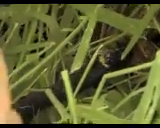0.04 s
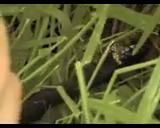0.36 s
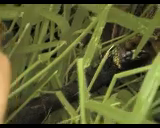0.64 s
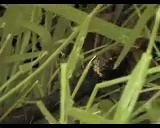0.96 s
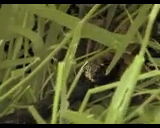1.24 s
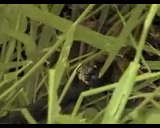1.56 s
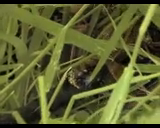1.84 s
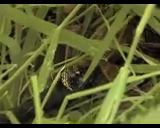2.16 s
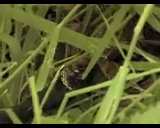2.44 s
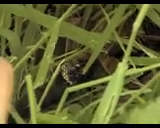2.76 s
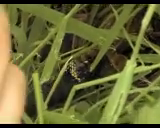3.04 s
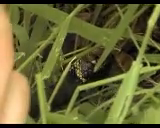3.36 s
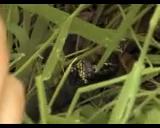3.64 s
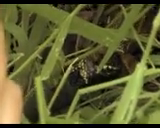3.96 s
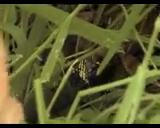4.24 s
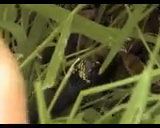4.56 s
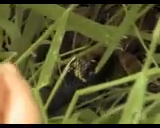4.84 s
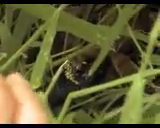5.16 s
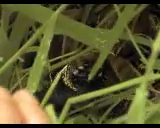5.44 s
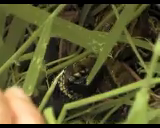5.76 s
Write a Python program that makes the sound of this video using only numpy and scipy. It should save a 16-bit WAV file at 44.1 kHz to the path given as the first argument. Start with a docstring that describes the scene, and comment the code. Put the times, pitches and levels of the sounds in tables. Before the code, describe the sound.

Heard from low in tall grass, distant traffic makes a continuous rushing noise with a deep engine rumble beneath it. Nearby, blades rustle and flick quietly as a hand moves among them, with one tiny squeak early on. A brief run of crisp stem cracks stands out before the middle, then the soft rustling goes on, with scattered ticks and two small snaps at the close.

```python
"""Tyre roar from a road some way off, heard from a stereo microphone low in tall grass.
The roar swells slowly as traffic passes, a little to the left, over a low rumble and far engines.
Close to the microphone a hand moves in the grass: blades hiss and flick as they slide over each
other, broad leaves swish and dry stems snap. There is one faint squeak."""
import sys
import numpy as np
from scipy import signal
from scipy.fft import rfft, irfft
from scipy.io import wavfile
from scipy.ndimage import uniform_filter1d

SR = 44100
rng = np.random.default_rng(int(sys.argv[2]) if len(sys.argv) > 2 else 0)


def to_wav(sig):
    """Store sig (one row per channel, or 1-D mono) as 16-bit WAV at the path in sys.argv[1].

    Samples outside -1..1 are clipped; the rate is SR.
    """
    pcm = np.clip(np.atleast_2d(sig), -1, 1) * 32767
    pcm = np.round(pcm).astype(np.int16)
    wavfile.write(sys.argv[1], SR, pcm.T)  # frames by channels


N = 264600
FRAME = 2048  # samples in one short sound or one spectral frame

# stereo width of the distant road: f/Hz, side over mid/dB
ROAD_WIDTH = [(25, -2), (48, -2.5), (75, -9), (125, -14), (250, -20), (700, -22), (1200, -18.5),
              (2000, -16), (4000, -12)]
# stereo width of the grass around the microphone: f/Hz, side over mid/dB
GRASS_WIDTH = [(2000, -12), (3100, -9), (3800, -8), (5200, -7), (5900, -9), (7500, -6.5), (9000, -4),
               (10500, -1)]
# spectrum of blades rubbing: f/Hz, relative level/dB
BLADE_SPECTRUM = [(800, -10), (2000, 1.5), (3000, 3.2), (3600, .7), (4400, .3), (5900, .7), (7000, 0),
                  (8500, -.2), (10000, -1.5), (10600, -4.5), (11500, -15), (12100, -34)]


def gain_of(db):
    """Decibels to amplitude."""
    return 10 ** (np.asarray(db) / 20)


def unit_rms(x):
    """Scales to rms 1."""
    return x / np.sqrt(np.mean(x ** 2) + 1e-20)


def over_frequency(points, hz):
    """Interpolates a table on a log-frequency axis."""
    f, value = np.transpose(points)
    return np.interp(np.log(hz + 1), np.log(f + 1), value)


def over_time(points):
    """Interpolates a time table at every sample."""
    s, value = np.transpose(points)
    return np.interp(np.arange(N) / SR, s, value)


def hump(hz, centre_hz, octaves):
    """A bell curve of height 1 on a log-frequency axis."""
    return np.exp(-.5 * (np.log2((hz + 1) / centre_hz) / octaves) ** 2)


def add(mix, s, sound):
    """Mixes a stereo sound in at time s."""
    part = mix[:, round(s * SR):][:, :sound.shape[1]]
    part += sound[:, :part.shape[1]]


def drift(cutoff_hz):
    """Slow random motion of rms 1."""
    hz = np.fft.rfftfreq(N, 1 / SR)
    lowpass = np.exp(-(hz / cutoff_hz) ** 2) * (hz > 0)
    return unit_rms(irfft(rfft(rng.standard_normal(N)) * lowpass, N))


def mid_side(drive, spectrum, width, tilt_db=0):
    """Colours two unrelated signals as mid and side, then decodes them to left and right at rms 1."""
    size = drive.shape[1]
    hz = np.fft.rfftfreq(size, 1 / SR)
    colour_db = over_frequency(spectrum, hz) + tilt_db * np.log2(hz / 6000 + .01)
    mid, side = rfft(drive) * gain_of(colour_db)
    side = side * gain_of(over_frequency(width, hz))
    return unit_rms(irfft([mid + side, mid - side], size))


def squeak(arch=0.088):
    """A faint peep, dead centre, whose pitch rises and falls."""
    # the peep: t/s, peak level/dB, top f/Hz, length/s
    peep = (.721, -48.5, 3420, .019)
    s, db, hz, length = peep
    bow = np.sin(np.linspace(0, np.pi, round(length * SR)))
    turns = np.cumsum(hz * (1 - arch * (1 - bow))) / SR
    out = np.zeros((2, N))
    add(out, s, gain_of(db) * bow[None] ** 2 * np.sin(2 * np.pi * turns))
    return out


def leaf_swishes(spread_db=0.5, flutter_db=4.0):
    """Broad leaves drag over each other close by: a grainy swish that rises and falls."""
    # drags: t/s, level/dB, half length/s
    drags = [(0.675, -57, .02), (1.3, -56, 0.2), (2.45, -61, 0.2), (3.085, -57, .035), (3.235, -57.5, .035)]
    # spectrum of a broad leaf: f/Hz, relative level/dB
    leaf_spectrum = [(1000, -20), (2200, -6), (3100, 0.5), (4400, -6), (6000, -5), (9000, -30)]
    t = np.arange(N) / SR
    level = sum(gain_of(db) * np.exp(-((t - s) / length) ** 2) for s, db, length in drags)
    grains = rng.standard_normal((2, N)) * gain_of(spread_db * np.minimum(rng.exponential(1, N), 4))
    return level * gain_of(flutter_db * drift(40)) * mid_side(grains, leaf_spectrum, GRASS_WIDTH)


def grass_rustle(gain_db=0.5, catches_per_s=900, spread_db=3.0, catch_db=-4, flutter_db=1.5):
    """Blades slide over each other around the microphone: a fine hiss with tiny catches."""
    # the hand stirring the grass: t/s, relative level/dB
    stirring = [(.1, -64), (.3, -58.5), (.64, -56), (.92, -55.5), (1.05, -57.5), (1.2, -54.5),
                (1.56, -55.5), (1.76, -59.5), (2.05, -58), (2.78, -56), (2.95, -57.5), (3.22, -55.5),
                (3.33, -58.5), (3.95, -59.5), (4.4, -58.7), (4.7, -56.5), (4.95, -58), (5.2, -59.5),
                (5.4, -59.5), (5.8, -57), (6, -58.5)]
    sizes = gain_of(spread_db * np.minimum(rng.exponential(1, N), 4))
    caught = rng.random(N) < catches_per_s / SR
    catches = unit_rms(sizes * caught * rng.uniform(-1.15, 1, (2, N)))
    friction = rng.standard_normal((2, N)) + gain_of(catch_db) * catches
    level = gain_of(gain_db + over_time(stirring) + flutter_db * drift(45))
    return level * mid_side(friction, BLADE_SPECTRUM, GRASS_WIDTH)


def blade_flicks(gain_db=5.0):
    """A nearby blade slips off another: a dry tick, then a short, grainy scratch."""
    # flicks: t/s, relative level/dB, decay/s, tilt/(dB per octave), tick re scratch/dB
    flicks = [(.041, -51, .004, -3.5, 8.5), (.244, -53, .005, -3.5, 8), (.462, -51, 0.0032, -1, 8),
              (0.648, -57, 0.005, -3, 10), (0.668, -57, 0.006, -2, 8), (.675, -51, .006, -1, 12),
              (.705, -54, 0.0028, 1, 15), (1.224, -50, .006, -1, 9), (1.232, -51, 0.0075, -6.5, 15),
              (1.433, -59, .004, 8, 12), (2.064, -55, .004, -3, 12), (2.654, -51, .003, -7, 15),
              (3.791, -53, .002, 1, 17), (3.867, -51.5, 0.0046, -1, 20), (4.099, -49.5, 0.0047, -3, 11),
              (4.557, -52, .005, -5, 15), (4.933, -52, .006, -2, -4), (4.9643, -46.5, 0.0018, 0, 19),
              (4.9686, -49, 0.0017, 0, 21), (5.158, -55, 0.0023, 2, 22), (5.407, -54, 0.0033, 2, 15),
              (5.4758, -46, 0.003, -1, 20), (5.484, -53, 0.0046, 6, 12), (5.596, -52, 0.0048, 3, 8),
              (5.752, -54, 0.0035, 2, 18), (5.774, -54, .003, 0, 15), (5.9165, -52, 0.004, 1, 6),
              (5.942, -53.5, .004, 1, 7), (5.95, -53, 0.016, 3, 17), (5.9695, -51, 0.007, 3, 17)]
    out, t = np.zeros((2, N)), np.arange(FRAME) / SR
    for s, db, decay, tilt_db, tick_db in flicks:
        slips = rng.laplace(size=(2, FRAME))
        # the tick comes as the blade lets go, in the mid channel only
        slips[0, np.argmax(t > decay / 10)] = gain_of(tick_db)
        scratch = mid_side(slips, BLADE_SPECTRUM, GRASS_WIDTH, tilt_db)
        add(out, s, gain_of(gain_db + db) * scratch * np.exp(-t / decay))
    return out


def stem_snaps(note_octaves=.062, tear_db=-24, tear_s=.0008, scatter_db=-8, scatter_s=.0022, left_db=1.0):
    """A dry stem close by cracks and rings, a few fibres tear, and the undergrowth scatters the sound."""
    # resonances of a dry stem: f/Hz, width/Hz, level over the crack/dB
    stem_modes = [(1780, 600, 14), (2750, 820, 7), (3800, 270, 2), (8950, 1500, 4)]
    # the bright tip of every crack: f/Hz, relative level/dB
    tip_spectrum = [(1500, -8), (10000, 0), (12000, -11)]
    # snaps: t/s, relative peak/dB, crack f/Hz, crack width/octaves, note f/Hz, note/dB, tip/dB
    snaps = [(2.1232, -35, 7750, 0.26, 8540, 3, -22), (2.2003, -30, 2200, 0.6, 4700, 12, -25),
             (2.2014, -30, 2600, 0.7, 5560, 11, -25), (2.217, -16, 3150, 0.45, 5880, 13, -8.5),
             (2.22, -28, 2900, .9, 4770, 8, -21), (2.3297, -25, 2900, 0.73, 3870, 9, -23),
             (2.3958, -36, 3200, 0.55, 4250, 7, -18), (2.4324, -37, 3320, .7, 5700, 9, -20),
             (2.508, -26, 2200, 0.67, 4000, 9, -27), (2.5705, -39, 3700, .4, 4100, 6, -25),
             (2.593, -36, 2800, 0.72, 4500, 8, -25), (4.2595, -46, 4500, .6, 5600, 19, -22),
             (5.918, -37, 10500, .16, 6000, -7, -12), (5.9693, -36, 8100, .22, 7900, 3, -24)]
    out, t, hz = np.zeros((2, N)), np.arange(FRAME) / SR, np.fft.rfftfreq(FRAME, 1 / SR)
    impulse = t == 0
    body = 1 + sum(gain_of(db) / (1 + (2 * (hz - f) / width) ** 2) for f, width, db in stem_modes)
    for s, db, crack_hz, octaves, note_hz, note_db, tip_db in snaps:
        tip = gain_of(tip_db + over_frequency(tip_spectrum, hz))
        note = gain_of(note_db) * hump(hz, note_hz, note_octaves)
        colour = body * (hump(hz, crack_hz, octaves) + tip) + note
        # minimum phase: the ring follows the crack
        log_spectrum = signal.hilbert(np.log(np.r_[colour, colour[-2:0:-1]])).conj()
        ring = np.fft.ifft(np.exp(log_spectrum)).real
        tearing = gain_of(tear_db) * rng.standard_normal(FRAME) * np.exp(-t / tear_s)
        crack = np.convolve(impulse + tearing, ring)[:FRAME]
        scatter = rng.standard_normal((2, FRAME)) * np.exp(-t / scatter_s)
        paths = impulse + gain_of(scatter_db) * scatter / np.linalg.norm(scatter[0])
        add(out, s, gain_of(db) * signal.fftconvolve(paths, crack[None] / abs(crack).max(), axes=1))
    return out * gain_of([[left_db], [-left_db]])


def engines(rumble_gain_db=0.83, waver_db=2.5, pull_s=0.38):
    """A distant rumble with a few wavering engine tones; each swells once as its engine pulls."""
    # course of the rumble: t/s, relative level/dB
    rumble_level = [(0, -38), (0.7, -38), (1.3, -38.5), (1.9, -39.5), (2.4, -38), (3, -40), (3.7, -39),
                    (4.5, -42), (5.1, -39.5), (5.8, -37)]
    # its spectrum: f/Hz, relative level/dB
    rumble_spectrum = [(10, -18), (25, -21), (40, -7), (52, -6), (66, 1.5), (95, 0), (120, -1.5), (165, -3),
                       (240, -4), (300, -3.5), (355, -5), (395, -15.5), (500, -11), (900, -59)]
    # engine tones: f/Hz, level/dB, pitch wander/fraction, hardest pull t/s, rise then/dB
    drones = [(74.46, -45.5, 0.031, 2.5, 4.5), (143, -51, 0.02, 2.47, 9), (185.2, -51, 0.007, 1.75, 3.5),
              (206.4, -57, 0.0293, 1.93, 11)]
    rumble = mid_side(rng.standard_normal((2, N)), rumble_spectrum, ROAD_WIDTH)
    out = gain_of(rumble_gain_db + over_time(rumble_level)) * rumble
    t = np.arange(N) / SR
    for hz, db, wander, s, pull_db in drones:
        turns = np.cumsum(hz * (1 + wander * drift(3.94))) / SR
        tone = unit_rms(np.sin(2 * np.pi * turns) * gain_of(waver_db * drift(1.56)))
        pull = np.exp(-((t - s) / pull_s) ** 2)
        out += gain_of(db + pull_db * pull) * tone
    return out


def tyre_roar(level_db=-32.0, patchy_db=1.07, flare_s=0.083, flare_octaves=0.12):
    """Tyres on the far road: two bands swell with the traffic; moving air makes patches come and go."""
    # spectrum of the roar: f/Hz, relative level/dB
    roar_spectrum = [(300, -48), (420, -9.5), (490, -8), (600, -1.46), (780, -0.5), (910, -0.95),
                     (1010, -2.5), (1120, -1.8), (1300, -5), (1450, -9.5), (1740, -16.5), (1950, -17),
                     (2300, -25), (3200, -34.5), (4500, -42.5), (9000, -65)]
    # the two bands in which tyres sing: f/Hz, width/octaves
    tyre_bands = [(815, 0.2), (1160, 0.13)]
    # swells of passing traffic: t/s, lower band gain/dB, upper band gain/dB
    traffic = [(0, -1, 0), (.33, 3.5, 3), (.55, -4, 0), (.9, 7, 2), (1.17, 4.5, 7.5), (1.36, 1.5, 1.5),
               (1.6, 5.3, 0.5), (2.05, 4, 1), (2.28, 3.5, 0), (2.5, 2, -0.5), (2.68, 2.5, 1.3),
               (3.05, 2.5, -2), (3.85, 0.5, 0.5), (4.1, 0, -0.5), (5.08, -4.5, -1), (5.3, 0, -2.2),
               (5.6, -0.7, 2), (6, -1, -2.5)]
    # brief flares on the roar's upper edge: t/s, f/Hz, gain/dB
    flares = [(1.6, 2150, 3), (2.56, 2150, 5), (2.66, 1470, 4.5), (4.52, 1400, 4)]
    steady = mid_side(rng.standard_normal((2, N)), roar_spectrum, ROAD_WIDTH)
    hz, t, frames = signal.stft(steady, SR, nperseg=FRAME)
    patches = rng.standard_normal(frames.shape[1:])
    for axis in (0, 1):  # smooth over frequency, then time
        patches = uniform_filter1d(patches, size=7, axis=axis)
    gain_db = patchy_db * unit_rms(patches)
    swell_times, *swells = np.transpose(traffic)
    for (band_hz, octaves), swell_db in zip(tyre_bands, swells):
        gain_db += np.outer(hump(hz, band_hz, octaves), np.interp(t, swell_times, swell_db))
    for s, flare_hz, db in flares:
        gain_db += db * np.outer(hump(hz, flare_hz, flare_octaves), np.exp(-((t - s) / flare_s) ** 2))
    _, roar = signal.istft(frames * gain_of(gain_db))
    return gain_of(level_db) * unit_rms(roar[:, :N])


def scene():
    """The road lies a little to the left; the grass is all around the microphone."""
    # the road's lean: f/Hz, left minus right/dB
    road_balance = [(30, 1), (70, 1.8), (500, 1.3), (1200, .8), (2500, .1)]
    lean_db = over_frequency(road_balance, np.fft.rfftfreq(N, 1 / SR))
    road = irfft(rfft(tyre_roar() + engines()) * gain_of([lean_db / 2, -lean_db / 2]), N)
    return road + grass_rustle() + leaf_swishes() + blade_flicks() + stem_snaps() + squeak()


def record(dry, cutoff_hz=11900):
    """A steep low-pass: nothing is heard above about 12 kHz."""
    lowpass = signal.firwin(401, cutoff_hz, window=("kaiser", 8), fs=SR)
    return signal.oaconvolve(dry, lowpass[None], "same")


dry = scene()
out = record(dry)
to_wav(out)
```